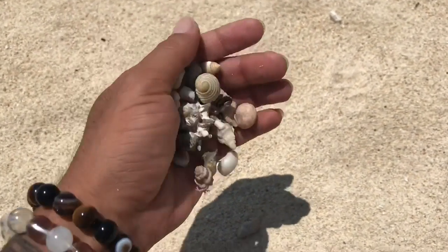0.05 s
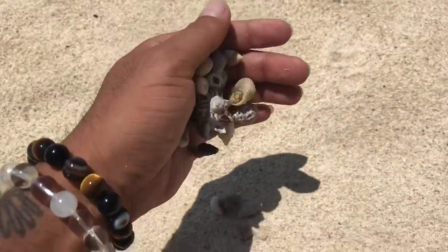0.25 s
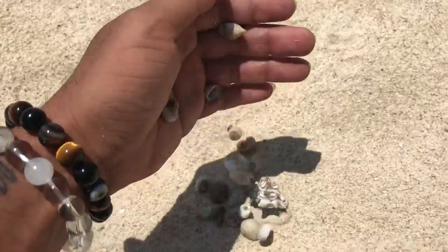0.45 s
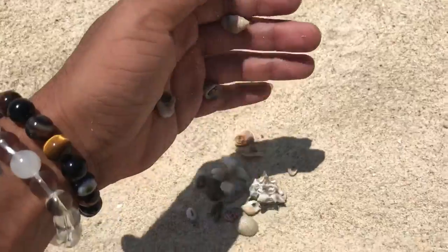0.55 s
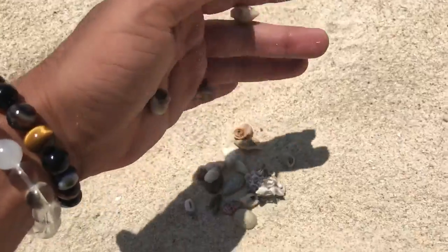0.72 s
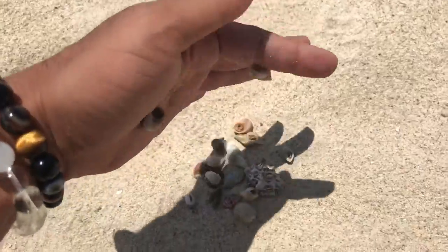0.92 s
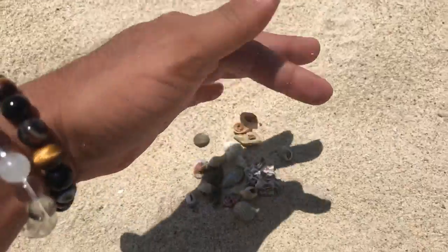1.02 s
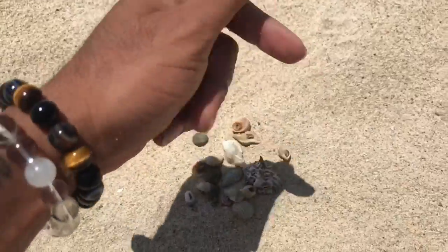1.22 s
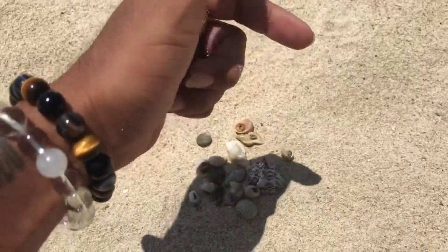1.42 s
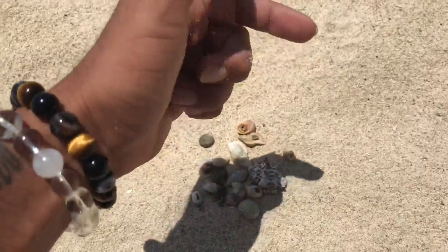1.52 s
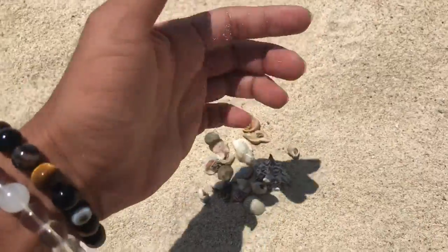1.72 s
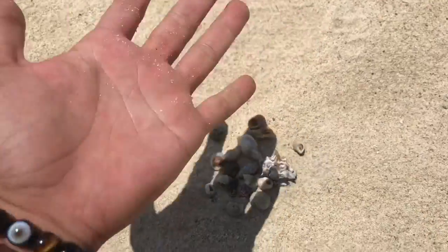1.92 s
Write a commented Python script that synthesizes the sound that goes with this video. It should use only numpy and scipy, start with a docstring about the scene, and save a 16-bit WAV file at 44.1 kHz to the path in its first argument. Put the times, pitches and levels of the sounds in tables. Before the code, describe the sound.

Small seashells slide and clink in a palm, close up, then tumble onto sand in a dense run of bright, gritty clicks from about 0.25 to 0.7 seconds. One straggler clatters down near 1 second, and another lands with a hollow knock at 1.2. Faint surf, wind, hiss and a distant engine hum lie underneath, with three very faint birdlike whistles from about 1.2 seconds on.

```python
"""Sea shells tumbling onto sand

Close to the microphone, a handful of small shells shifts in a palm and tumbles onto a heap on the sand;
two stragglers follow. Each contact is a short bright click with a faint ring; the larger shells knock
hollowly, and sand grits between them. Farther off: a low rumble of surf and wind, a distant engine's
hum, thin hiss and faint rising whistles like a far bird. Open air, no room."""
import sys
import numpy as np
from scipy import signal
from scipy.fft import rfft, irfft
from scipy.io import wavfile
from scipy.ndimage import uniform_filter1d

SR = 44100
rng = np.random.default_rng(int(sys.argv[2]) if len(sys.argv) > 2 else 0)


def dump_mix(stems):
    """Bounce the given channels to the path in sys.argv[1] as a 16-bit WAV at rate SR."""
    frames = np.atleast_2d(stems).T  # one column per channel
    limited = np.clip(frames, -1, 1)  # hard clip at full scale
    pcm = np.round(limited * 32767).astype(np.int16)
    wavfile.write(sys.argv[1], SR, pcm)


N = 85995
CONTACT_SAMPLES, TOP_HZ = 2048, 16400
TIME, CONTACT_TIME = np.arange(N) / SR, np.arange(CONTACT_SAMPLES) / SR


def undb(db):
    return 10 ** (np.asarray(db) / 20)


def unit_energy(x):
    return x / np.sqrt(np.sum(x ** 2))


def envelope(rows):
    """Gain over time from rows of t/s, level/dB."""
    return undb(np.interp(TIME, *np.array(rows).T))


def colour(x, spectrum):
    """Shape by rows of f/Hz, level/dB, then scale to rms 1."""
    hz, db = np.array(spectrum).T
    f = np.maximum(np.fft.rfftfreq(len(x), 1 / SR), 1)
    gain = undb(np.interp(np.log(f), np.log(hz), db))
    shaped = irfft(rfft(x) * gain, len(x))
    return shaped / np.std(shaped)


def noise(spectrum, samples=N):
    return colour(rng.standard_normal(samples), spectrum)


def pulse(gain):
    """The shortest causal pulse with this spectrum."""
    cepstrum = irfft(np.log(gain + 1e-5))
    cepstrum[1:CONTACT_SAMPLES // 2] *= 2
    cepstrum[CONTACT_SAMPLES // 2 + 1:] = 0
    return unit_energy(irfft(np.exp(rfft(cepstrum))))


def decay(t60_s):
    return np.exp(-np.log(1000) * CONTACT_TIME / t60_s)


def damped_sine(hz, t60_s):
    return np.sin(2 * np.pi * hz * CONTACT_TIME) * decay(t60_s)


def wander(per_s):
    """Smooth random motion with a spread of 1."""
    width = max(int(SR / per_s), 1)
    smooth = uniform_filter1d(uniform_filter1d(rng.standard_normal(N), width), width)
    return smooth / np.std(smooth)


def add(out, start_s, x):
    i = int(np.clip(start_s * SR, 0, N - 1))
    out[i:i + len(x)] += x[:N - i]


# Surf, well behind the shells: f/Hz, relative level/dB
SURF_SPECTRUM = [(20, -31), (55, -1.5), (100, -1.5), (195, -3.5), (250, -4.5), (310, -10.5), (400, -16.5),
                 (520, -20), (800, -26.5), (1400, -29), (2200, -47), (5000, -68)]

def surf():
    """The sea breaks in a steady low rumble."""
    return noise(SURF_SPECTRUM) * undb(-52.5)


# Wind over the open beach: f/Hz, relative level/dB
WIND_SPECTRUM = [(20, -25), (55, 11.5), (85, 8), (135, 3.5), (250, -27)]
# Its gust at the microphone: t/s, level/dB
WIND_GUST = [(0, -65), (.65, -59.5), (1.12, -52), (1.45, -55), (1.7, -59.5), (1.95, -59.5)]

def wind():
    """One deep gust swells under the surf and eases."""
    return noise(WIND_SPECTRUM) * envelope(WIND_GUST)


# Hiss in the background: f/Hz, relative level/dB
HISS_SPECTRUM = [(300, -14.5), (1200, 4.5), (3000, 9), (6500, 6.5), (8000, -5), (9800, -5), (10400, -16),
                 (11300, 0), (15600, -7), (16000, -29.5)]
# Its course: t/s, level/dB
HISS_ENVELOPE = [(0, -65), (.7, -65), (1.2, -64), (1.61, -64.5), (1.65, -75), (1.95, -73)]

def hiss():
    """A thin hiss that drops near the end."""
    return noise(HISS_SPECTRUM) * envelope(HISS_ENVELOPE)


# An engine far off, harmonics 6 to 10 of its beat: level/dB
ENGINE_HARMONICS = [-55, -62, -54, -55.5, -65]

def engine_hum(beat_hz=21.94, fade_db_per_s=2.5, swell_db=2.25):
    """A soft, receding hum like a far boat; each harmonic swells and fades on the way."""
    out = np.zeros(N)
    for harmonic, db in enumerate(ENGINE_HARMONICS, 6):
        gain = undb(db - fade_db_per_s * TIME + swell_db * wander(per_s=4.7))
        out += gain * np.sin(2 * np.pi * (harmonic * beat_hz * TIME + rng.random()))
    return out


# Sand and shell edges gritting, close up: t/s, level/dB
GRIT_ENVELOPE = [(0, -51.5), (.2, -66), (.33, -52.5), (.40, -51), (.42, -35.5), (.455, -48), (.47, -62),
                 (.5, -36.5), (.52, -63), (.56, -66), (.62, -67.5), (.67, -74), (.71, -63), (.94, -77),
                 (.98, -54.5), (1.06, -49), (1.12, -76), (1.24, -78), (1.29, -55), (1.36, -69.5),
                 (1.47, -64), (1.55, -70), (1.95, -103)]
# Their shared tone: f/Hz, relative level/dB
GRIT_SPECTRUM = [(500, -39.5), (1800, -28), (3700, -4.5), (7000, 4), (12000, -2), (15500, -7), (16500, -19)]
RUBBING_BANDS_HZ = np.linspace(500, 17000, 24)

def grit(shells=10, ticks_per_s=1000, spread_db=11, uneven_db=3):
    """Sand catches between shells in tiny ticks, each shell with its own tone."""
    out = np.zeros(N)
    shared_db = np.interp(RUBBING_BANDS_HZ, *np.array(GRIT_SPECTRUM).T)
    for own_db in uneven_db * rng.standard_normal((shells, len(RUBBING_BANDS_HZ))):
        sizes = undb(spread_db * np.minimum(rng.exponential(size=N), 3))
        signs = np.sign(rng.standard_normal(N))
        catches = rng.random(N) < ticks_per_s / shells / SR
        out += colour(sizes * signs * catches, np.c_[RUBBING_BANDS_HZ, shared_db + own_db])
    return out / np.std(out) * envelope(GRIT_ENVELOPE)


# Shells sliding in the palm, close to the microphone: t/s, level/dB
SLIDE_ENVELOPE = [(0, -59.5), (.12, -52), (.175, -54), (.22, -51), (.33, -55.5), (.43, -74.5), (.52, -81.5),
                  (.7, -97)]
# Their rasp: f/Hz, relative level/dB
SLIDE_SPECTRUM = [(1000, -41), (2100, -20), (3000, 0.5), (3900, -14.5), (4500, -1.5), (5100, -20),
                  (6400, -1.5), (7800, -16), (15000, -21), (16500, -35)]

def palm_slide(flicker_db=3.5):
    """Shells rub over one another in an uneven rasp, each band flickering on its own."""
    rasp = np.zeros(N)
    for hz in RUBBING_BANDS_HZ:
        band = noise([(hz / 2, -40), (hz, 0), (hz * 2, -40)])
        rasp += band * undb(flicker_db * wander(per_s=200))
    return colour(rasp, SLIDE_SPECTRUM) * envelope(SLIDE_ENVELOPE)


def palm_clinks(count=36, until_s=0.43, low_hz=2940, high_hz=7900, max_over_slide_db=11.5):
    """Shells nudge each other in tiny pitched clinks that follow the strength of the sliding."""
    out, slide_gain = np.zeros(N), envelope(SLIDE_ENVELOPE)
    for when, pitch, size in rng.random((count, 3)):
        start_s = when * until_s
        hz = low_hz + pitch * (high_hz - low_hz)
        peak = size * undb(max_over_slide_db) * slide_gain[int(start_s * SR)]
        add(out, start_s, peak * damped_sine(hz, t60_s=0.008))
    return out


# Shell striking shell, close up: t/s, energy level/dB, centre f/Hz, sharpness Q
SHELL_CONTACTS = [ (0.0484, -20.5, 8900, 2.44), (0.0707, -24, 6100, 1.2), (0.1063, -9.5, 11100, 0.76),
                  (0.1096, -12.5, 6400, 3.2), (0.1150, -23.5, 5770, 2), (0.1198, -18.5, 3500, 2),
                  (0.122, -20, 9500, 1.37), (0.1532, -17.5, 10600, 0.68), (0.1744, -23, 9900, 1.2),
                  (0.1958, -22, 4270, 3.4), (0.2766, -22, 9000, 1.46), (.312, -18, 4460, 1.9),
                  (0.1914, -21.5, 6000, 0.82), (.2046, -12.5, 7500, 0.92), (0.2383, -16, 7000, 0.93),
                  (.2490, 4.5, 12300, 2.7), (.2536, -11, 12000, 0.72), (0.2638, -12, 12900, 2.6),
                  (0.2862, 0, 11800, 1.7), (0.297, -14, 9300, 1.2), (0.3014, -19, 6960, 2.3),
                  (0.3297, -20, 8500, 1.5), (0.351, -6.5, 8300, 4.1), (0.353, -8, 12000, 3.8),
                  (0.358, -13.5, 10400, 1.3), (0.3652, -20, 8600, 2.4), (0.3814, -18, 8800, 3),
                  (0.3897, -2.5, 7540, 1.8), (.3930, -12, 11500, 1.8), (0.3973, -8.5, 9000, 2.1),
                  (0.401, -8.5, 6700, 3.8), (0.4046, -6.5, 11500, 1.8), (0.413, -18, 8600, 1.83),
                  (0.423, -17, 9460, 1.4), (0.4253, -12, 9000, 0.77), (0.43, -11.5, 10300, 1.4),
                  (0.4384, -9.5, 10700, 2.3), (0.4405, -13, 10400, 1.1), (0.4473, 4, 13800, 2.2),
                  (0.4502, 1.5, 13900, 6.3), (0.4538, -5.5, 12200, 1.95), (0.4576, -9, 8000, 1.4),
                  (.4600, -16, 11500, 3), (0.4786, 1, 8700, 0.69), (0.4783, 1, 12000, 1.6),
                  (0.4951, 5.5, 9400, 3.7), (0.4972, -3, 7360, 2.7), (0.5007, -13, 7000, 2),
                  (0.4978, -11.5, 8700, 1.1), (0.5011, 2, 8500, 0.91), (0.5043, -10, 7100, .9),
                  (0.506, -5.5, 8800, 0.57), (0.5125, -12, 10000, 0.78), (.5260, -20, 7200, 3.3),
                  (0.5328, -4, 9900, 1.28), (0.5429, -16.5, 8900, 0.37), (0.5496, 4, 7500, 1.2),
                  (0.5521, 1, 11600, 3.9), (0.554, -4, 11500, 4.1), (.5580, -4, 10000, 0.82),
                  (0.562, -7, 12300, 1.93), (0.563, -3, 12600, 4.2), (0.5673, -4.5, 13300, 3),
                  (0.5689, -4, 12600, 1.7), (0.5741, -11, 8950, 0.82), (0.5821, -14, 5380, 5.2),
                  (.5900, -2.5, 9800, 1.6), (0.5925, -4, 8100, 3.1), (0.5986, -9, 7800, 3.5),
                  (0.6073, -13, 10800, 0.75), (0.6164, -23, 9000, 0.62), (0.6441, -8, 8050, 2),
                  (0.6475, -19, 9300, 1.1), (0.6627, -14, 7140, 0.49), (.6661, -20, 8200, 0.92),
                  (0.6693, -14, 7800, 1.3), (0.6828, -5, 9800, 1.2), (0.7352, -18.5, 10900, 0.79),
                  (0.7658, -18, 12030, 1.4), (0.9677, 0, 7960, 3.8), (0.9726, -4, 12200, 3.4),
                  (0.9738, -6, 8450, 5.5), (0.9828, -7, 7500, 9.9), (0.9867, -13, 8200, 2.1),
                  (0.988, -22, 8700, 1.8), (0.9964, -17, 9000, 0.77), (1.0066, -17.5, 8100, 1.97),
                  (1.016, -15.5, 8460, 1.6), (1.0282, -25, 8300, 1.45), (1.0404, -20.5, 8700, 1.7),
                  (1.057, -22.5, 7100, 2.6), (1.2207, 1, 11500, 1.08), (1.2233, -1.5, 10500, 1.8),
                  (1.2262, -5, 12200, 1.1), (1.2284, -14, 12500, 2.2), (1.2306, -9, 13000, 1.15),
                  (1.2728, -15.5, 11000, 0.67), (1.28, -26.5, 10000, 1), (1.2977, -22, 10400, 0.63),
                  (1.3154, -26, 5860, 2.45), (1.4703, -31, 8000, 1.36), (1.4980, -19.5, 11340, 1.2),
                  (1.9359, -25, 12500, 3.5)]

def shell_clicks(uneven_db=3, bass_cut_hz=2400, ring_low_hz=2894, ring_db=-13.5):
    """Each contact is one heavily damped resonance, coloured by chance; the walls ring on faintly."""
    out = np.zeros(N)
    f = np.fft.rfftfreq(CONTACT_SAMPLES, 1 / SR) + 1
    bass_cut = f / np.hypot(f, bass_cut_hz)  # small shells radiate little bass
    top_cut = 1 / np.hypot(1, (f / TOP_HZ) ** 16)
    for start_s, db, hz, q in SHELL_CONTACTS:
        body = bass_cut / np.hypot(1, q * (f / hz - hz / f))
        ripple = np.interp(f, np.linspace(0, SR / 2, 30), rng.standard_normal(30))
        tick = pulse(body * undb(uneven_db * ripple) * top_cut)
        pitches, sizes = rng.random((2, 24))
        modes_hz = ring_low_hz + pitches * (TOP_HZ - ring_low_hz)
        weights = (2 * sizes - 1) * np.sqrt(np.interp(modes_hz, f, body))
        ring = unit_energy(weights @ damped_sine(modes_hz[:, None], t60_s=0.018))
        add(out, start_s, undb(db) * (tick + undb(ring_db) * ring))
    return out


# Larger shells knocking, close up: t/s, f/Hz, energy level/dB, T60/s
SHELL_TONES = [(.0703, 4900, -30, .012), (.1145, 4600, -22, .015), (.131, 3350, -30, 0.015),
               (.249, 2285, -24.5, 0.018), (.2634, 6300, -13, 0.0051), (.287, 850, -32, 0.023),
               (.297, 5950, -19, .009), (.3298, 5000, -26, 0.0077), (0.3891, 3660, -17.5, 0.0113),
               (0.3993, 4100, -14.5, .005), (0.4036, 4450, -16.5, 0.005), (0.478, 4070, -17.5, 0.02),
               (0.4977, 1920, -19.5, .015), (0.4985, 543, -27, 0.034), (0.5005, 3600, -12, 0.016),
               (.5497, 1370, -24, 0.0057), (.590, 1880, -20, 0.01), (1.2207, 2290, -17, 0.028),
               (1.2207, 1960, -20.5, 0.049), (1.2207, 6430, -14, .012), (1.2232, 6520, -13, .009),
               (1.2232, 8400, -13, .006)]

def hollow_knocks():
    """A struck shell rings at a clear pitch, from its hollow or its wall."""
    out = np.zeros(N)
    for start_s, hz, db, t60_s in SHELL_TONES:
        add(out, start_s, undb(db) * unit_energy(damped_sine(hz, t60_s)))
    return out


# Shells landing on the heap by the microphone: t/s, energy level/dB
HEAP_LANDINGS = [(.249, -32), (0.2858, -32.5), (0.5, -28.5), (0.5499, -27), (.558, -31), (0.590, -31),
                 (.6441, -37), (.6680, -33), (0.682, -33.5), (0.9682, -28), (1.2205, -25), (1.935, -37)]
# The sand under them: f/Hz, relative level/dB
SAND_SPECTRUM = [(100, -13), (500, -5.5), (800, 2), (1400, -4), (2500, 1.5), (5000, -36), (12000, -41.5)]

def landings():
    """A shell's weight comes down with a dull puff of sand."""
    out = np.zeros(N)
    for start_s, db in HEAP_LANDINGS:
        puff = noise(SAND_SPECTRUM, CONTACT_SAMPLES) * decay(t60_s=0.077)
        add(out, start_s, undb(db) * unit_energy(puff))
    return out


def settling_thump(start_s=0.53, length_s=0.0698, hz=42.3, db=-46.5):
    """A soft, deep bump as the bulk of the handful settles on the sand."""
    t = TIME - start_s
    swell = np.sin(np.pi * np.clip(t / length_s, 0, 1)) ** 2
    return undb(db) * swell * np.sin(2 * np.pi * hz * t)


# Whistles far from the microphone: t/s, length/s, level/dB, top f/Hz
FAR_WHISTLES = [(1.15, 0.19, -63, 5000), (1.415, 0.15, -63, 5350), (1.775, 0.25, -67.5, 5700)]

def whistles(low_hz=4300, rise_s=0.088, waver_hz=71, width_hz=560):
    """Each faint, birdlike whistle glides up and levels off, wavering."""
    out = np.zeros(N)
    for start_s, length_s, db, top_hz in FAR_WHISTLES:
        t = TIME - start_s
        rise = np.sin(np.pi / 2 * np.clip(t / rise_s, 0, 1)) ** 2
        hz = low_hz + (top_hz - low_hz) * rise + waver_hz * wander(per_s=70)
        swell = np.sqrt(np.abs(np.sin(np.pi * np.clip(t / length_s, 0, 1))))
        flutter = wander(width_hz)  # widens the tone into a narrow band of noise
        out += undb(db) * flutter * swell * np.sin(2 * np.pi * np.cumsum(hz) / SR)
    return out


def scene():
    """Shells up close and the beach behind, at one microphone."""
    heap = shell_clicks() + hollow_knocks() + landings() + settling_thump() + grit()
    mix = heap + palm_slide() + surf() + hiss() + wind() + whistles() + palm_clinks() + engine_hum()
    return mix[None]


def record(dry):
    """The recorder clips at full scale and cuts the top."""
    lowpass = signal.firwin(121, TOP_HZ, fs=SR, window=("kaiser", 7))
    return signal.fftconvolve(np.clip(dry, -1, 1), lowpass[None], mode="same")


dry = scene()
out = record(dry)
dump_mix(out)
```